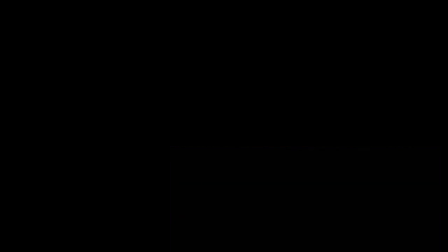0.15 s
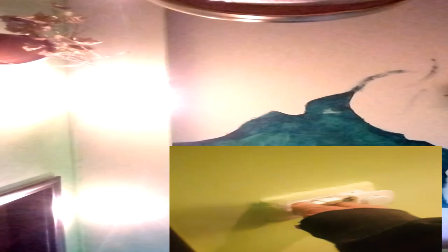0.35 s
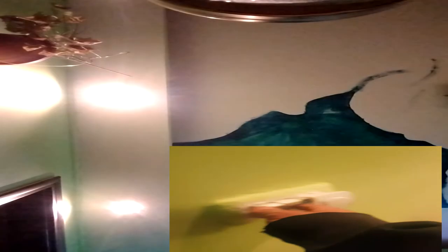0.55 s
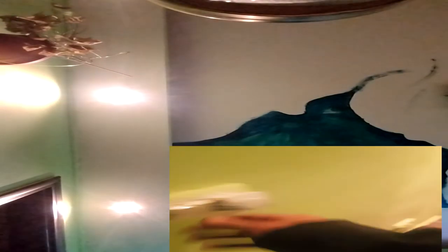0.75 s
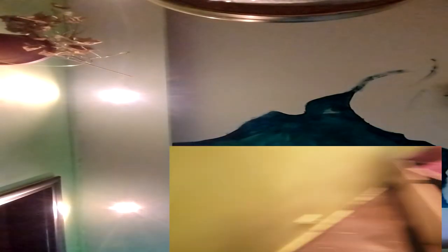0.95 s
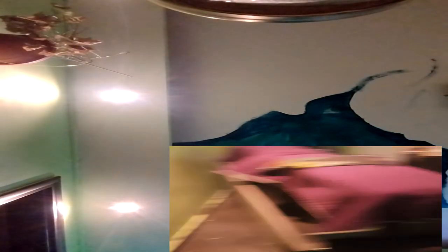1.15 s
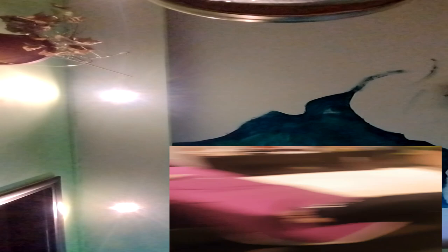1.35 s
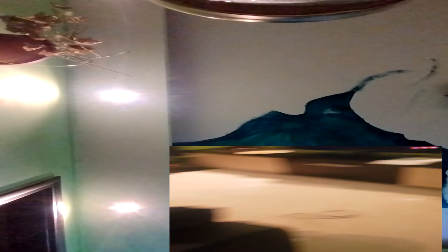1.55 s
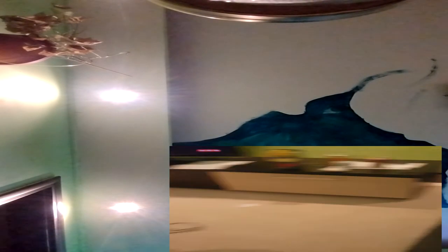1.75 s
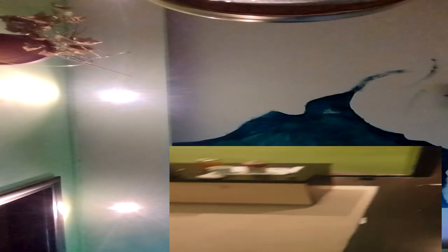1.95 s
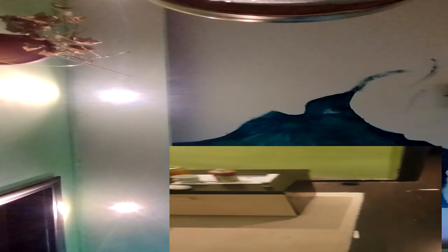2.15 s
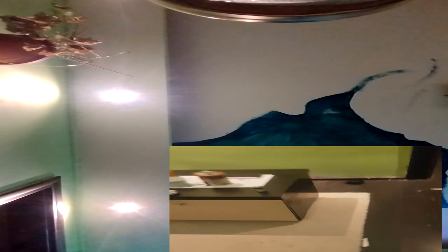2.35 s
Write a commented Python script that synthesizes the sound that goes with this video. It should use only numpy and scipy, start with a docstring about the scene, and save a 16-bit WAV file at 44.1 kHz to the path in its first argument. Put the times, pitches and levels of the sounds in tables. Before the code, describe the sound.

A plastic wall switch gives one sharp, close click at about 0.2 seconds, echoing briefly in the room. From about 0.9 to 2.1 seconds, low, uneven puffs of air buffet the microphone, mostly on the left. A sleeve swishes faintly around 1.8 seconds, then feet scuff softly until 2.4 seconds, with a small knock near 2.1. Faint room rumble and hiss lie underneath.

```python
"""A sharp click comes first: a plastic wall switch snaps over, close by in a furnished room.
Its plastic and metal parts ring briefly, and the room echoes them. Then the person holding
the camera turns away: air buffets its two microphone openings, a sleeve swishes and feet
scuff softly on the floor. The hand and body add small knocks, over faint rumble and hiss."""
import sys
import numpy as np
from scipy import signal
from scipy.fft import rfft, irfft, next_fast_len
from scipy.io import wavfile
from scipy.ndimage import uniform_filter1d, map_coordinates

SR = 44100
rng = np.random.default_rng(int(sys.argv[2]) if len(sys.argv) > 2 else 0)


def store_wav(level_fs):
    """Save 16-bit WAV to argv[1]."""
    pcm = np.round(np.clip(np.atleast_2d(level_fs), -1, 1) * 32767)
    wavfile.write(sys.argv[1], SR, pcm.T.astype(np.int16))


N = 105840  # 2.4 seconds

# Hits inside the switch: start_s, plastic_db, metal_db, left_minus_right_db
SWITCH_HITS = [(.111, -47, -51, 1), (0.222, -42, -33, -6.5), (0.2249, -19.5, -8.5, 1.5),
               (.2280, -4, -7.5, -0.5), (0.233, -25, -16.5, 7.5)]
# Ringing tones of the rocker and cover plate: pitch_hz, level_db, fade_s
PLASTIC_TONES = [(521.5, -17, 0.063), (600, -14.5, 0.04), (686, -26, 0.026), (1690, -9, 0.0053),
                 (1868, -4, .019), (1952, -10.5, 0.027), (2512, -17.5, 0.017), (3570, -11, 0.021),
                 (3755, -13, 0.02), (4980, -17, .015)]
# Ringing tones of the spring and contact arm: pitch_hz, level_db, fade_s
METAL_TONES = [(6000, -25, 0.016), (7520, -11, 0.01984), (9450, -1, .012), (9780, 4, 0.0066),
               (10350, -4, .015), (10680, -5, 0.022), (12540, -2.5, 0.011), (13200, -8.5, .012),
               (14940, -3, .01)]
# Tone colour of the noisy crack in each hit: pitch_hz, level_db
CRACK_COLOUR = [(300, -14.5), (600, -4), (1000, -18), (1800, 2), (2800, -6.5), (3600, -3.5), (6000, -8.5),
                (8000, -2.5), (10000, 4.5), (13000, -3.5), (16000, -3)]
# How the click leans to one side: pitch_hz, left_minus_right_db
CLICK_BALANCE = [(250, -1.5), (560, -5), (800, -1.5), (1150, 0.5), (1850, 0.5), (4000, 1), (7000, -9.5),
                 (9500, 3), (11000, 3.5), (15000, 4.5)]
def switch():
    """The finger lands, the spring snaps the contact shut, the rocker seats and bounces."""
    plastic = ring(PLASTIC_TONES, attack_s=0.00014)
    metal = ring(METAL_TONES, attack_s=0.00026)
    click = np.zeros((2, N))
    for start_s, plastic_db, metal_db, side_db in SWITCH_HITS:
        tones = amp(plastic_db - 12) * plastic + amp(metal_db - 16.5) * metal
        hit = amp(metal_db - 7.5) * noise(CRACK_COLOUR) * decay(start_s, fade_s=0.011)
        first = round(start_s * SR)
        hit[:, first:first + tones.shape[1]] += tones
        click += pan(side_db) * hit
    bass_cut = signal.butter(2, 360, "high", fs=SR, output="sos")  # thins out below 360 Hz
    click = signal.sosfilt(bass_cut, click)
    direct = filtered(click, lambda hz: pan(along(CLICK_BALANCE, hz)))
    return direct + early_echoes(direct) + amp(-7) * room(click)


def ring(tones, attack_s, right_delay_s=0.00018):
    """A struck part rings with several fading tones, which reach the right side a little later."""
    t = np.maximum(np.arange(SR // 6) / SR - np.array([[0], [right_delay_s]]), 0)
    ringing = sum(amp(db) * fade(t, fade_s) * np.sin(2 * np.pi * hz * t) for hz, db, fade_s in tones)
    return ringing * (1 - np.exp(-t / attack_s))


# Bounces off the arm, wall and furniture: left_delay_s, right_delay_s, level_db
NEARBY_ECHOES = [(.0038, .0047, -7), (.0068, .0073, -14.5), (0.0095, 0.0114, -17), (0.023, 0.019, -19),
                 (0.024, 0.0286, -25), (.0612, .0624, -26.5)]
def early_echoes(sound):
    """Nearby surfaces send back weak copies that reach the two sides at different times."""
    def delays(hz):
        return sum(amp(db) * np.exp(-2j * np.pi * hz * np.array([[left_s], [right_s]]))
                   for left_s, right_s, db in NEARBY_ECHOES)
    return filtered(sound, delays)


# How long the room rings: pitch_hz, fade_s
ROOM_FADES = [(200, 1), (600, 0.32), (2000, 0.39), (4000, 0.36), (7000, 0.33), (11000, 0.26), (16000, 0.15)]
# Tone colour of the room's echo: pitch_hz, level_db
ECHO_COLOUR = [(150, 11), (260, 5), (420, -3), (580, -1), (750, 4), (1000, 1), (1500, -2.5), (1900, -4),
               (2700, 3), (3700, 3), (5000, 4), (7000, 1), (10000, -5), (16000, -2)]
def room(sound, build_s=0.0058):
    """Many echoes blur into one tail, whose high pitches die first."""
    hz, t, bands = signal.stft(rng.standard_normal((2, SR * 3 // 4)), SR, nperseg=256)
    shape = fade(t, along(ROOM_FADES, hz)[:, None]) * (1 - np.exp(-t / build_s))
    tail = signal.istft(bands * shape, SR, nperseg=256)[1]
    echo = signal.fftconvolve(sound, tail / np.linalg.norm(tail[0]), axes=1)[:, :N]
    return filtered(echo, lambda hz: amp(along(ECHO_COLOUR, hz)))


# Strength of the air at each opening, and of its finer swirls: time_s, level_db
LEFT_AIR_LEVELS = [(0, -81.5), (.2, -71), (.24, -59), (.42, -67), (.57, -60.5), (.61, -49), (.68, -63.5),
                   (.82, -63.5), (.87, -40), (.92, -57), (.98, -35.5), (1.05, -40), (1.12, -32),
                   (1.27, -37), (1.32, -41.5), (1.47, -43), (1.51, -59), (1.57, -41.5), (1.62, -38.5),
                   (1.66, -54), (1.72, -36), (1.81, -39.5), (1.86, -55), (1.95, -57), (2, -44.5),
                   (2.13, -46.5), (2.21, -64.5), (2.4, -57)]
RIGHT_AIR_LEVELS = [(0, -83), (.2, -77.5), (.26, -58.5), (.4, -63.5), (.8, -65.5), (.86, -53.5),
                    (1.22, -61.5), (1.38, -45.5), (1.45, -45), (1.51, -61), (1.6, -55), (1.69, -62),
                    (1.74, -39.5), (1.82, -45.5), (1.91, -41), (2, -41.5), (2.04, -53), (2.4, -68)]
FINE_SWIRL_LEVELS = [(.85, -78), (.97, -61.5), (1.03, -66.5), (1.085, -49), (1.15, -60), (1.26, -63),
                     (1.4, -68), (1.55, -86)]
# Tone colours of the big and the fine swirls: pitch_hz, level_db
BIG_SWIRL_COLOUR = [(12, -28.5), (22, -15), (35, -8.5), (60, 3.5), (100, -5), (150, -13), (260, -27),
                    (400, -41.5), (700, -55), (1500, -69)]
FINE_SWIRL_COLOUR = [(100, -20.5), (250, 4.5), (400, -2), (600, -12), (1000, -32.5), (2000, -45.5)]
# Single puffs of air: peak_s, level_db, pitch_hz, left_minus_right_db
AIR_PUFFS = [(0.87, -47, 61, 14), (0.988, -45, 69, 14), (1.089, -31, 94.2, 31.5), (1.118, -42, 200, 32.5),
             (1.248, -44.5, 155, 29.5), (1.464, -40, 66.2, 23.5), (1.615, -40, 74.4, 29),
             (1.806, -35.5, 65, 19), (1.911, -38, 92, -18.5), (2.091, -43, 224, 14)]
def air(puff_width_cycles=0.41):
    """Air swirls and puffs at the microphone openings, with finer swirls in the fastest swing."""
    swirls = noise(BIG_SWIRL_COLOUR)
    strength = np.sqrt(np.abs(uniform_filter1d(swirls ** 2, size=1500, axis=1)) + .01)
    even_swirls = swirls / strength
    buffeting = even_swirls * np.array([level(LEFT_AIR_LEVELS), level(RIGHT_AIR_LEVELS)])
    for peak_s, db, hz, side_db in AIR_PUFFS:
        cycles = (np.arange(N) / SR - peak_s) * hz
        swell = np.exp(-.5 * (cycles / puff_width_cycles) ** 2)
        buffeting += pan(side_db) * amp(db) * np.cos(2 * np.pi * cycles) * swell
    fine_swirls = amp(-3.5) * level(FINE_SWIRL_LEVELS) * noise(FINE_SWIRL_COLOUR)
    return buffeting + pan(8.5) * fine_swirls


# Loudness of the sliding sleeve and of the shifting clothes: time_s, level_db
SWISH_LEVELS = [(1.6, -79.5), (1.69, -63), (1.8, -62), (1.89, -57), (1.93, -67), (2.02, -72.5), (2.2, -81),
                (2.3, -66.5), (2.4, -73)]
RUSTLE_LEVELS = [(0, -82), (.65, -84.5), (.85, -72), (1.2, -71.5), (1.42, -74.5), (1.55, -69.5),
                 (1.68, -72), (1.92, -71.5), (2.03, -66.5), (2.4, -65.5)]
# Their tone colours: pitch_hz, level_db
SWISH_COLOUR = [(1500, -40), (4000, -18), (6000, -14.5), (9000, 4), (10300, 4), (14000, -3), (16000, -19.5)]
RUSTLE_COLOUR = [(200, 11), (500, 2), (1500, -1), (2500, -8), (5500, -7), (8000, -9), (16000, -5.5)]
def clothes():
    """Fibres slide over each other: a fine sleeve swish over a softer rustle as the body turns."""
    swish = level(SWISH_LEVELS) * grainy_noise(SWISH_COLOUR, flutter_db=1.5, rate_hz=250)
    rustle = level(RUSTLE_LEVELS) * grainy_noise(RUSTLE_COLOUR, flutter_db=1.8, rate_hz=35)
    return pan(5) * swish + pan(-5) * rustle


# Scuffs on the floor: peak_s, rise_s, fall_s, sole_db, hiss_db
FOOT_SCUFFS = [(1.875, 0.036, 0.075, -61, -91), (1.915, 0.0053, 0.13, -53, -95),
               (2.13, 0.029, 0.023, -45.5, -48.5), (2.213, 0.022, 0.031, -54.5, -91),
               (2.367, 0.0055, 0.03, -66, -49), (2.381, 0.028, 0.061, -55.5, -81)]
# Tone colours of the sole and of its rubbing hiss: pitch_hz, level_db
SOLE_COLOUR = [(100, -4.5), (220, 4), (400, 2.5), (750, -8), (1200, -12), (1700, -20), (2200, -19),
               (3200, -36), (6000, -31), (16000, -50)]
RUB_COLOUR = [(1000, -35), (3000, -19), (5200, -14), (6700, -5.5), (9000, -5), (12500, -2.5), (16000, -14)]
def feet():
    """A sole rubs the floor: a dull, gritty sound swells and fades, with hiss on top."""
    t, scuffs = np.arange(N) / SR, np.zeros((2, N))
    sole = grainy_noise(SOLE_COLOUR, flutter_db=3, rate_hz=170)
    hiss = grainy_noise(RUB_COLOUR, flutter_db=1.9, rate_hz=400)
    for peak_s, rise_s, fall_s, sole_db, hiss_db in FOOT_SCUFFS:
        stroke = np.exp(-np.maximum((peak_s - t) / rise_s, (t - peak_s) / fall_s))
        scuffs += stroke * (amp(sole_db) * sole + amp(hiss_db) * hiss)
    return pan(-1) * scuffs


# Small ticks and knocks: start_s, level_db, pitch_hz, room_echo_db
BODY_KNOCKS = [(.111, -58, 9800, -2.5), (.493, -61, 3340, -11), (0.493, -58.5, 526, 0),
               (0.802, -65, 1714, -1.5), (1.205, -63, 2240, -5), (1.912, -58, 1480, 3.5),
               (2.135, -34.5, 368, -23), (2.137, -46, 2080, -3.5), (2.135, -43.5, 12300, -12),
               (2.211, -49.5, 1090, -1.5), (2.356, -45.5, 556, -11), (2.376, -44, 576, 2)]
def knocks(half_width_octaves=0.22):
    """The hand and moving body make short bursts of noise, each around one pitch, which the room echoes."""
    direct, to_room = np.zeros((2, 2, N))
    for start_s, db, pitch_hz, room_db in BODY_KNOCKS:
        def band(hz):
            return 1 / (1 + (np.log2((hz + 1) / pitch_hz) / half_width_octaves) ** 2)
        burst = unit(filtered(rng.standard_normal((2, N)), band))
        knock = amp(db) * burst * decay(start_s, fade_s=0.022)
        direct += knock
        to_room += amp(room_db) * knock
    return pan(-4.5) * (direct + room(to_room))


# Tone colour of the background: pitch_hz, level_db
BACKGROUND_COLOUR = [(20, 10.5), (60, 12.5), (100, 21), (200, 19.5), (350, 13.5), (600, 6.5), (1000, -0.5),
                     (2500, -3), (5000, -9.5), (7400, -22), (9200, -6), (12000, -0.5), (16000, -2)]
def background():
    """Faint, steady room rumble and hiss."""
    return pan(0.5) * amp(-66) * noise(BACKGROUND_COLOUR)


def amp(db):
    """Turn decibels into a multiplier."""
    return 10 ** (np.asarray(db) / 20)


def unit(sound):
    """Scale a sound to an average power of 1."""
    return sound / np.sqrt(np.mean(sound ** 2) + 1e-20)


def pan(side_db):
    """Left and right multipliers; the left is louder by side_db."""
    return amp(np.array([[.5], [-.5]]) * side_db)


def along(points, hz):
    """Read a table between its pitches, spaced by octaves."""
    pitches, values = np.transpose(points)
    return np.interp(np.log(hz + 1), np.log(pitches + 1), values)


def level(points):
    """Join (time_s, level_db) points into a multiplier for every sample."""
    return amp(np.interp(np.arange(N) / SR, *np.transpose(points)))


def fade(t, fade_s):
    """Fall by 60 dB every fade_s seconds."""
    return np.exp(-np.log(1000) * t / fade_s)


def decay(start_s, fade_s):
    """Jump from silence to 1 at start_s, then fade."""
    t = np.arange(N) / SR - start_s
    return (t >= 0) * fade(np.abs(t), fade_s)


def filtered(sound, response):
    """Multiply each pitch in a sound by response(hz)."""
    size = next_fast_len(N + SR // 2)
    hz = np.fft.rfftfreq(size, 1 / SR)
    return irfft(rfft(sound, size) * response(hz), size)[..., :N]


def noise(colour):
    """Separate left and right noise; colour says how strong each pitch is."""
    return unit(filtered(rng.standard_normal((2, N)), lambda hz: amp(along(colour, hz))))


def grainy_noise(colour, flutter_db, rate_hz):
    """Noise whose loudness glides to a new random value rate_hz times a second."""
    smooth = noise(colour)
    flutter = map_coordinates(rng.standard_normal(N // 8), [np.arange(N) * rate_hz / SR], mode="mirror")
    return unit(smooth * amp(flutter_db * flutter))


def scene():
    """Add all the sounds together."""
    return switch() + air() + clothes() + feet() + knocks() + background()


def record(dry, top_hz=15900):
    """The camera cuts off the very highest pitches."""
    return filtered(dry, lambda hz: 1 / np.sqrt(1 + (hz / top_hz) ** 200))


dry = scene()
out = record(dry)
store_wav(out)
```